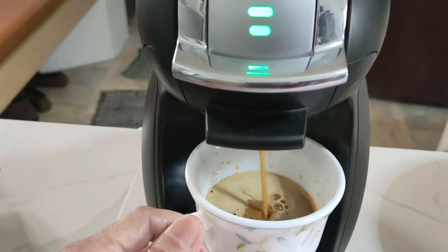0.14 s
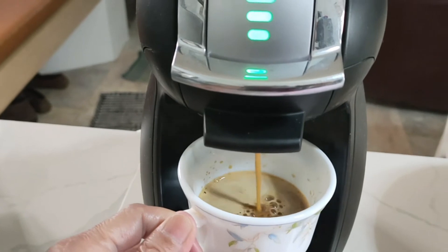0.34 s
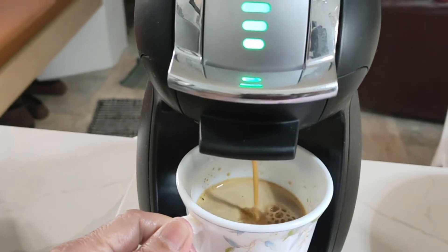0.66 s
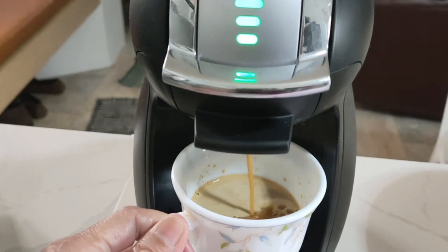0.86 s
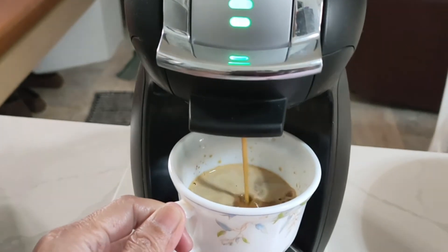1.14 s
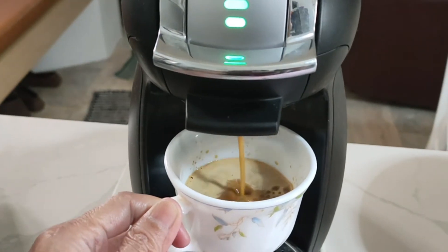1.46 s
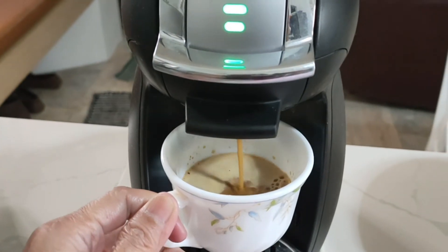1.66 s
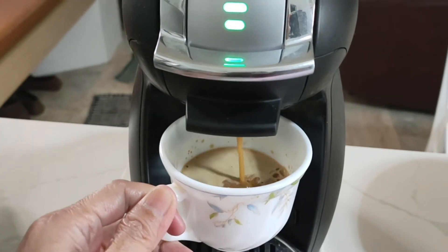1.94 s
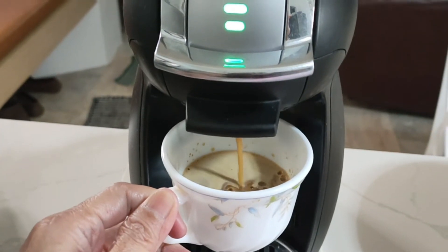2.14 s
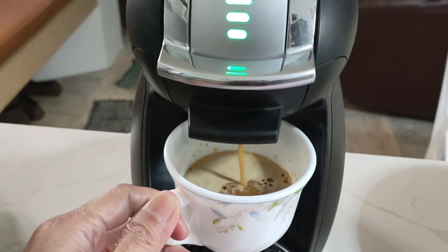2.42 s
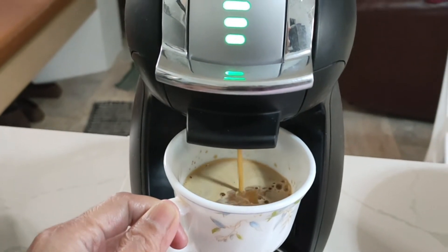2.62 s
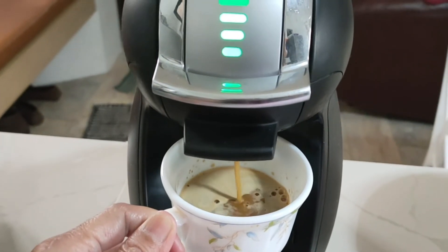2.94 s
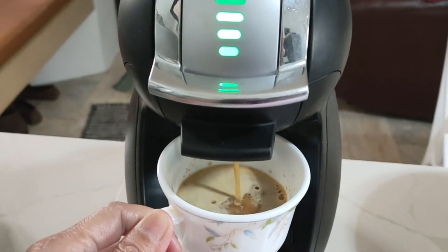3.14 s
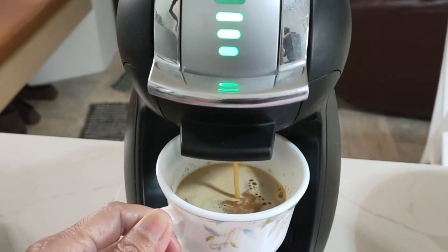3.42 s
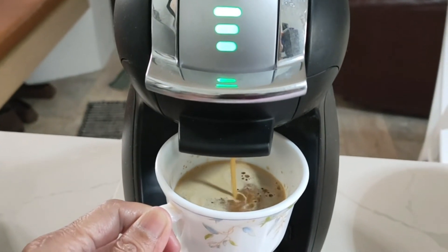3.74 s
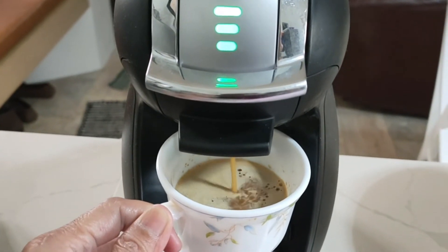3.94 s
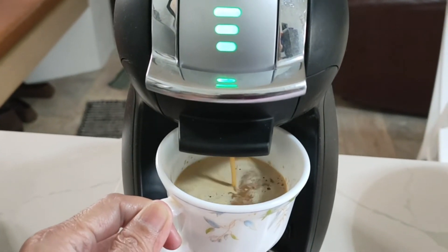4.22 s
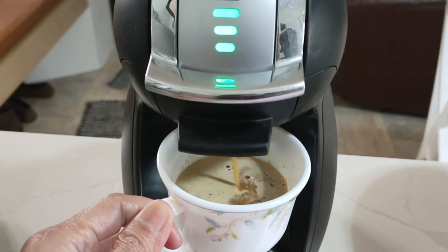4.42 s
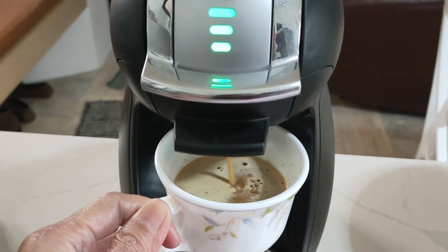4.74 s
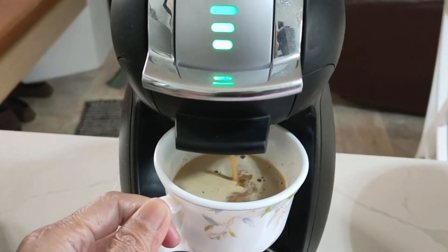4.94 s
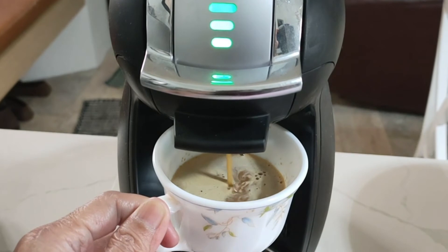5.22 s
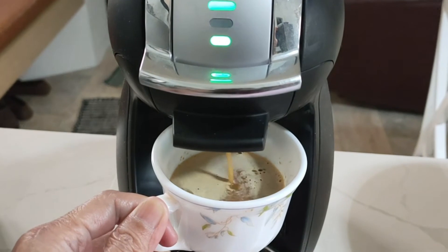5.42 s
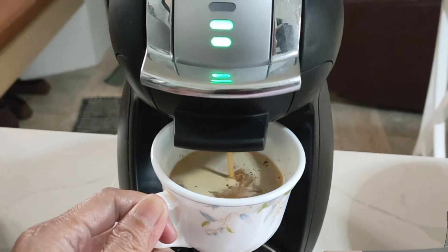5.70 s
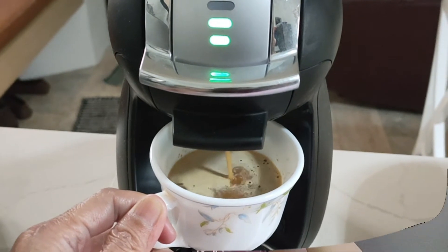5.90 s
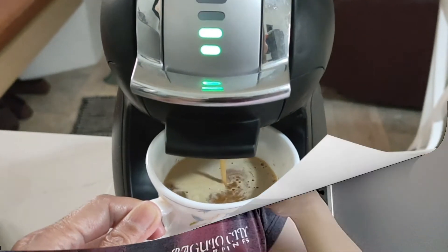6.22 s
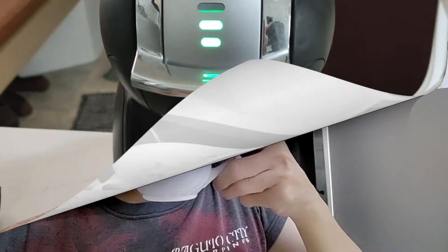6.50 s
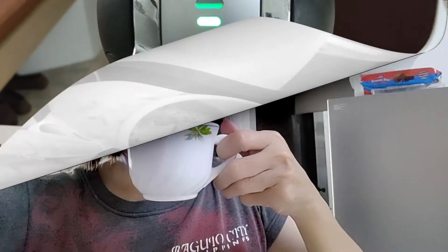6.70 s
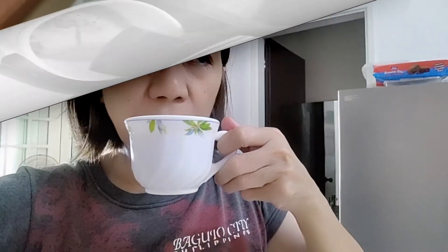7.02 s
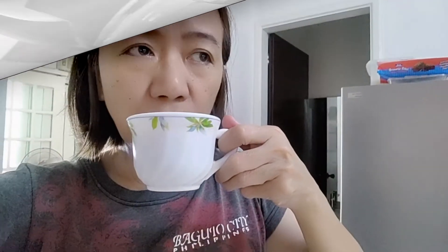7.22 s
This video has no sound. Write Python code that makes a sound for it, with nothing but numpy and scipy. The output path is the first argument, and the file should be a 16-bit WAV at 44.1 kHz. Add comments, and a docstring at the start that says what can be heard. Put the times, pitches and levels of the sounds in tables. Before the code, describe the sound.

A capsule coffee machine's pump buzzes and rattles steadily close by, with fizzy spurts and sharp clicks, then fades, cuts off, and leaves faint room noise.

```python
"""A capsule coffee machine brews into a cup on a kitchen counter, close to a phone.
From the start, each pump stroke thumps the housing, knocks panels, rattles the casing, ticks the valves
and spurts coffee: shaped impulses ring resonators or gate noise. Hard valve snaps stand out.
Late on, the brewing sound fades, then cuts off; after a silence a quiet room of filtered noise is heard."""
import sys
import numpy as np
from scipy import signal
from scipy.fft import rfft, irfft
from scipy.io import wavfile

SR = 44100
rng = np.random.default_rng(int(sys.argv[2]) if len(sys.argv) > 2 else 0)


def materialize(psi):
    """Save the field psi as 16-bit PCM at rate SR to the path in sys.argv[1].

    A 1-D psi becomes a single channel; in a 2-D psi each row is a channel.
    """
    bounded = np.clip(np.atleast_2d(psi).T, -1, 1)
    quanta = np.round(bounded * 32767).astype(np.int16)
    wavfile.write(sys.argv[1], SR, quanta)


N = 324135
T = np.arange(N) / SR

PUMP_HZ = 60.1085
STOP_S, ROOM_FROM_S = 6.668, 7.266


def undb(db):
    """Decibels to amplitude gain."""
    return 10 ** (np.asarray(db) / 20)


def unit(x):
    """Scale to rms 1, over all ports together."""
    return x / np.sqrt(np.mean(x ** 2))


def on_log(points, hz):
    """Interpolate (frequency [Hz], level [dB]) on a log-frequency axis."""
    points_hz, db = np.transpose(points)
    return np.interp(np.log(hz + 1e-9), np.log(points_hz), db)


def colour(x, points):
    """Causal minimum-phase filter of the given (frequency [Hz], gain [dB]) shape."""
    size = 8192
    gain_db = on_log(points, np.fft.rfftfreq(size, 1 / SR))
    cepstrum = irfft(np.log(undb(gain_db)))
    # folding the cepstrum forward gives minimum phase
    cepstrum[1:size // 2] *= 2
    cepstrum[size // 2 + 1:] = 0
    response = irfft(np.exp(rfft(cepstrum)))
    return signal.fftconvolve(x, response)[:N]


def swing(x, points):
    """Zero-phase filter: the response builds up as smoothly as it dies away."""
    size = 2 * N
    gain = undb(on_log(points, np.fft.rfftfreq(size, 1 / SR)))
    return irfft(rfft(x, size) * gain)[:N]


def ring(x, modes):
    """Parallel resonances (frequency [Hz], width [Hz], gain [dB])."""
    total = 0
    for hz, width_hz, db in modes:
        b, a = signal.iirpeak(hz, hz / width_hz, fs=SR)
        total = total + undb(db) * signal.lfilter(b, a, x)
    return total


def pulses(times_s, sizes):
    """One impulse at each time."""
    index = np.clip(times_s * SR, 0, N).astype(int)
    return np.bincount(index, sizes, N + 1)[:N]


def fade(x, decay_s):
    """Each impulse becomes a falling exponential."""
    return signal.lfilter([1], [1, -np.exp(-1 / (decay_s * SR))], x)


def port_noise(shared):
    """White noise for the two ports; shared is the common fraction of power."""
    shared = np.clip(shared, 0, 1)
    common = rng.standard_normal(N)
    separate = rng.standard_normal((2, N))
    return np.sqrt(shared) * common + np.sqrt(1 - shared) * separate


def air(points, shared):
    """Steady coloured room noise, rms 1."""
    return unit(np.array([colour(n, points) for n in port_noise(shared)]))


# quiet room spectrum: (frequency [Hz], gain [dB])
ROOM_SHAPE = [(25, 15), (70, 0.5), (130, -2.5), (350, -3.5), (520, -8), (650, -12.5), (1000, -11),
              (1600, -17), (2900, -15), (3900, -21), (6800, -21), (9500, -20), (12000, -31), (15500, -30)]


def quiet_room():
    """Soft room noise with a faint high whine, a narrow resonance of noise."""
    whine = unit(ring(rng.standard_normal(N), [(7650, 70, 0)]))
    return undb(-40.0) * air(ROOM_SHAPE, shared=0.39) + undb(-62) * whine


# kitchen air spectrum: (frequency [Hz], gain [dB])
KITCHEN_SHAPE = [(20, 7), (45, -21), (80, -1.5), (120, 5.5), (200, 0), (500, 4.5), (2000, -14.5),
                 (8000, -17.5), (16000, -32.5)]


def kitchen():
    """Steady noise of the kitchen air behind the machine."""
    return undb(-54.5) * air(KITCHEN_SHAPE, shared=0.74)


# uneven strokes, mostly falling short: (time [s], level offset [dB])
WEAK_STROKES = [(.133, -3), (.632, -6), (.848, 0.5), (1.514, -2.5), (1.531, -4.5), (2.03, -1), (5.29, -2)]


def strokes(jitter_s, scatter_db):
    """Time [s] and strength [dB] of every stroke: a steady rate, a little uneven."""
    times_s = np.arange(int(STOP_S * PUMP_HZ) + 2) / PUMP_HZ
    strength_chance, time_chance = rng.standard_normal((len(times_s), 2)).T
    db = scatter_db * strength_chance
    for weak_s, offset_db in WEAK_STROKES:
        db[np.argmin(abs(times_s - weak_s))] += offset_db
    return times_s + jitter_s * time_chance, db


def blows(stroke, turn, scatter_db):
    """An impulse at one point (turn [cycles]) of every stroke, each with its own size."""
    times_s, db = stroke
    chance = np.clip(rng.standard_normal(len(db)), -2, 2)
    return pulses(times_s + turn / PUMP_HZ, undb(db + scatter_db * chance))


# bubble spit spectrum: (frequency [Hz], gain [dB])
SPIT_SHAPE = [(2000, -15), (4500, -0.5), (8000, 0), (11000, -2.5), (15500, -10.5)]


def spits(stroke):
    """Air bubbles burst through the capsule after the outlet tick: noise bursts of very uneven size."""
    hits = blows(stroke, turn=0.58, scatter_db=5.5)
    burst = fade(hits, decay_s=.0025) * port_noise(shared=0.3)
    return unit(np.array([colour(c, SPIT_SHAPE) for c in burst]))


# valve resonances: (frequency [Hz], width [Hz], gain [dB])
VALVE_MODES = [(4415, 250, 6.5), (4920, 180, -19), (5380, 83, -17.5), (5600, 140, 1.5), (5980, 250, 15.5),
               (6620, 180, -10.5), (6420, 280, 13.5), (7380, 350, -9.5), (8000, 160, -19),
               (9000, 1300, -31.5)]


def valve(hits):
    """Each closing is a brief chatter that rings the valve; the room keeps a faint tail."""
    contact = fade(hits, decay_s=.0008)
    tail = undb(-32.0) * fade(hits, decay_s=0.011)
    chatter = (contact + tail) * np.sign(port_noise(shared=.6))
    return np.array([ring(c, VALVE_MODES) for c in chatter])


def valve_ticks(stroke):
    """The outlet valve ticks once a stroke and bounces; the inlet valve answers very unevenly."""
    outlet = blows(stroke, turn=.495, scatter_db=3.0)
    bounce = blows(stroke, turn=.69, scatter_db=4)
    inlet = blows(stroke, turn=-.05, scatter_db=7)
    return unit(valve(outlet + undb(-5.5) * bounce + undb(-8) * inlet))


# capsule spurt spectrum, also used by snaps: (frequency [Hz], gain [dB])
SPURT_SHAPE = [(1500, -14.5), (3200, -18), (4700, 4.5), (5500, 7), (6300, 2.5), (7700, 7), (9200, 5.5),
               (11000, -1), (12800, -30), (15500, -17)]


def spurt(stroke):
    """Coffee and air fizz through the capsule; the air in each dose sets how loud it is."""
    times_s, db = stroke
    dose = times_s, db + 1.9 * rng.standard_normal(len(db))
    opening = blows(dose, turn=.42, scatter_db=2)
    main = blows(dose, turn=.535, scatter_db=2)
    after = blows(dose, turn=.69, scatter_db=2)
    pull = blows(dose, turn=.02, scatter_db=2)
    gush = opening + undb(-3) * main + undb(2.5) * after + undb(-7.5) * pull
    steady = 0.068
    fizz = (fade(gush, decay_s=0.0051) + steady) * port_noise(shared=.35)
    return unit(np.array([colour(c, SPURT_SHAPE) for c in fizz]))


# hardest valve snaps: (time [s], relative level [dB])
HARD_SNAPS = [(0.7228, -25), (0.7896, -28.5), (1.3463, -26), (2.3206, -27.5), (2.7846, -28), (2.845, -28.5),
              (3.052, -27.5), (3.0929, -27), (3.2685, -30.5), (3.3516, -28), (3.8252, -29.5), (4.034, -25),
              (4.101, -30.5), (4.9737, -27), (5.0484, -25), (5.3722, -29), (5.8048, -23)]


def snaps():
    """A hard closing rings the valve and shoots a sharp spit through the capsule."""
    times_s, db = np.transpose(HARD_SNAPS)
    hits = pulses(times_s, undb(db - 2))
    spit = fade(hits, decay_s=0.0047) * port_noise(shared=0.36)
    spray = np.array([colour(c, SPURT_SHAPE) for c in spit])
    return undb(-0.5) * valve(hits) + undb(-5.5) * spray


# piston contacts within a stroke: (turn [cycles], level [dB])
PISTON_CONTACTS = [(-.15, -2), (.04, -2), (.17, -5.5), (.42, -4), (.54, -7)]
# loose casing resonances: (frequency [Hz], width [Hz], gain [dB])
CASING_MODES = [(426, 67, -19.5), (719, 110, -2), (843, 51, -3), (984, 63, -2), (1140, 132, 3),
                (1273, 37, -1), (1496, 300, 3), (1743, 150, 5.5), (1878, 55, 6.5), (2310, 86, -15),
                (2498, 137, 0), (2910, 630, -6), (3720, 71, -6)]
# rattle spectrum on top of the casing: (frequency [Hz], gain [dB])
RATTLE_SHAPE = [(200, -35), (420, 12), (560, -10), (680, 2), (1000, 2.5), (1800, -2), (2600, 0), (3200, -8),
                (4300, -4.5), (7000, -2.5), (16000, -3.5)]


def rattle(stroke):
    """The loose casing chatters as the piston is pulled, lands and springs back, and never quite settles."""
    hits = sum(undb(db) * blows(stroke, turn, scatter_db=2) for turn, db in PISTON_CONTACTS)
    restless = .2
    chatter = (fade(hits, decay_s=0.0023) + restless) * port_noise(shared=0.38)
    return unit(np.array([colour(ring(c, CASING_MODES), RATTLE_SHAPE) for c in chatter]))


# plastic panel resonances: (frequency [Hz], width [Hz], gain [dB])
PANEL_MODES = [(596.7, 7.4, 0.5), (671.4, 12.9, 5.5), (729.4, 10, 5.5), (777.7, 27, 3), (842, 9.9, 4.5),
               (902, 20, 6), (960.6, 17, 3.5), (1019.6, 35, 2.5), (1084, 18, 3.5), (1143, 40, -3),
               (1320, 30, -2.5), (1383, 8.3, 1), (1455, 13, -1.5), (1915, 110, -32), (2565, 110, -12)]


def knock(stroke):
    """The piston meets its stop and rings the panels, nearly alike; low bending waves arrive later."""
    hits = blows(stroke, turn=-0.0737, scatter_db=0.8)
    delay_at_1khz_s = 0.002756
    total = 0
    for mode in PANEL_MODES:
        delay = int(delay_at_1khz_s * SR * np.sqrt(1000 / mode[0]))
        total = total + np.roll(ring(hits, [mode]), delay)
    return unit(total)


# housing response to a stroke: (frequency [multiples of stroke rate], gain [dB])
HOUSING_THUMP = [(1, -34), (2, -19), (3, -9), (4, 1.5), (5, 3.5), (6, -5.5), (7, -24), (8, -24), (10, -61),
                 (16, -68.5)]


def hum(stroke):
    """The piston's smooth swing shakes the housing; noise keeps the hollow body booming between strokes."""
    push = -blows(stroke, turn=-0.06, scatter_db=0.54)
    thump = swing(push, [(k * PUMP_HZ, db) for k, db in HOUSING_THUMP])
    body_modes = [(232.0, 7.2, -1.5), (254.5, 8.7, 4.0), (276, 4.3, -4), (349.5, 16, -0.5)]
    boom = [ring(ring(n, body_modes), [(270, 230, 0)]) for n in port_noise(shared=0.96)]
    return unit(thump) + undb(-12) * unit(np.array(boom))


# swell of the treble fizz: (time [s], level [dB])
FIZZ_SWELL = [(0.0, -4), (0.2, 0.5), (0.6, -3.1), (1.6, -0.6), (2.0, -2.3), (2.1, 1.6), (2.8, 0.5),
              (3.2, -1.3), (3.3, 3), (3.4, -2.1), (3.6, 1.3), (3.8, -2), (3.9, 1.4), (4.5, -2), (5.3, 1.2),
              (5.7, -0.2), (5.9, 0.75)]
HUM_DB, HUM_RISE_DB_PER_S = -32.5, 0.12
KNOCK_DB, RATTLE_DB, RATTLE_EASE_DB_PER_S = -43, -37.5, 0.21
SPURT_DB, TICK_DB, SPIT_DB = -48, -48, -58.5
RATTLE_FOLLOWS_DB_PER_DB = 0.4  # knock and rattle per dB of fizz


def machine():
    """The pump drives all layers; hum grows slightly, knock and rattle ease, treble swells."""
    stroke = strokes(jitter_s=.00005, scatter_db=0.86)
    fizz_db = np.interp(T, *np.transpose(FIZZ_SWELL))
    shake_db = RATTLE_FOLLOWS_DB_PER_DB * fizz_db - RATTLE_EASE_DB_PER_S * T
    low = undb(HUM_DB + HUM_RISE_DB_PER_S * T) * hum(stroke)
    shake = undb(KNOCK_DB) * knock(stroke) + undb(RATTLE_DB) * rattle(stroke)
    treble = undb(SPURT_DB) * spurt(stroke) + undb(TICK_DB) * valve_ticks(stroke)
    treble += undb(SPIT_DB) * spits(stroke)
    return low + undb(shake_db) * shake + undb(fizz_db) * treble + snaps()


# port differences: (frequency [Hz], left minus right [dB], left lead [rad])
PORT_STEERING = [(300, 0.5, 0.043), (600, -3, .05), (746, 3, 0.13), (1080, 0, 0.84), (1485, -5.5, 1.32),
                 (1670, -6, 3.64), (2070, 0, 5.84), (2310, -6, 6.45), (2810, 1.5, 9.2), (3430, 2.5, 5.2),
                 (4060, 1.5, 9.04), (5650, -4, 3.5), (6290, -8.5, 8), (6690, -6.5, 13.3), (7550, -4.5, 14),
                 (8940, 1, 14.1), (12170, -0.5, 17.2), (14880, -5.5, 20)]


def ports(x):
    """The cup bay steers each frequency its own way, in level and phase, between the two ports."""
    size = 2 * N
    hz, tilt_db, lead_rad = np.transpose(PORT_STEERING)
    f = np.fft.rfftfreq(size, 1 / SR)
    gain = undb(np.interp(f, hz, tilt_db) / 2)
    half = gain * np.exp(.5j * np.interp(f, hz, lead_rad))
    return irfft(rfft(x, size) * np.array([half, 1 / half]))[:, :N]


FADE_FROM_S, FADE_DB_PER_S = 5.92, 7.5


def scene():
    """The machine brews, fades with the kitchen air and cuts off; silence, then the quiet room."""
    brewing = ports(machine()) + kitchen()
    fading = undb(-FADE_DB_PER_S * np.maximum(T - FADE_FROM_S, 0))
    return brewing * fading * (T < STOP_S) + quiet_room() * (T > ROOM_FROM_S)


TOP_HZ = 15900


def record(dry):
    """The phone cuts the top with a steep elliptic low-pass."""
    low_pass = signal.ellip(10, .2, 80, TOP_HZ, fs=SR, output="sos")
    return signal.sosfilt(low_pass, dry)


dry = scene()
out = record(dry)
materialize(out)
```